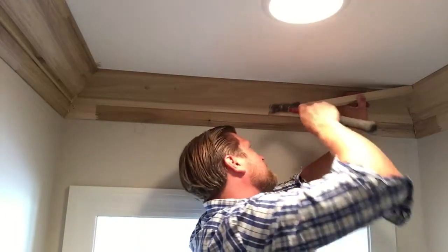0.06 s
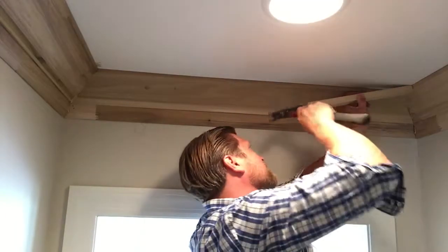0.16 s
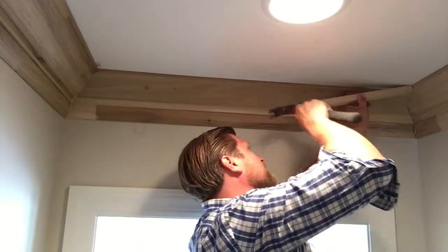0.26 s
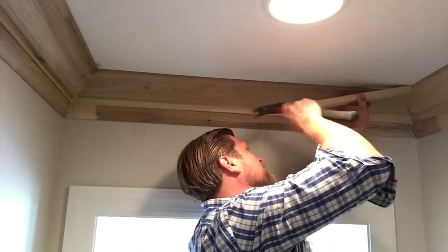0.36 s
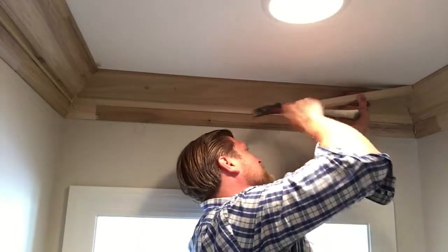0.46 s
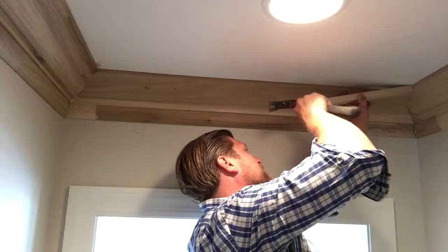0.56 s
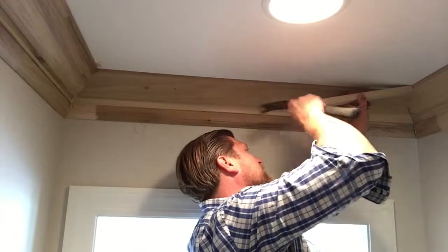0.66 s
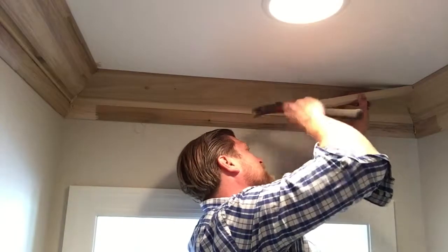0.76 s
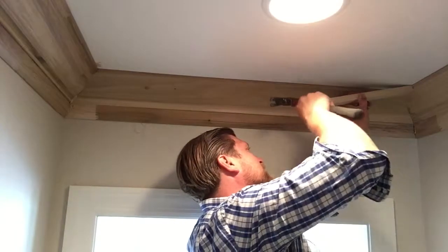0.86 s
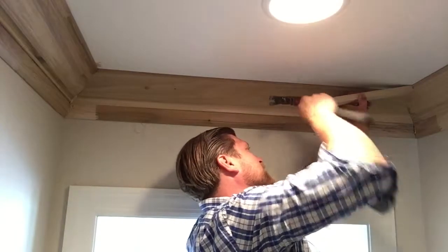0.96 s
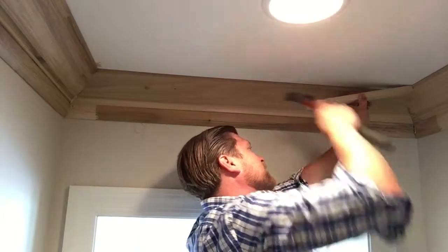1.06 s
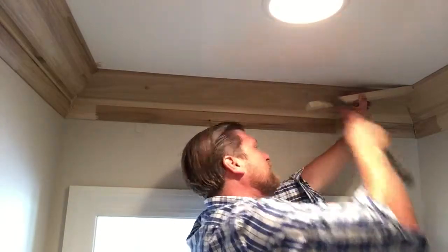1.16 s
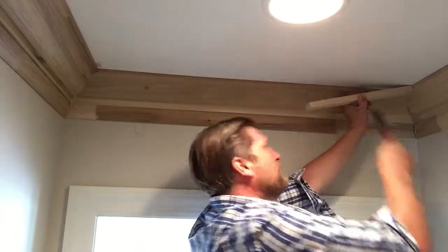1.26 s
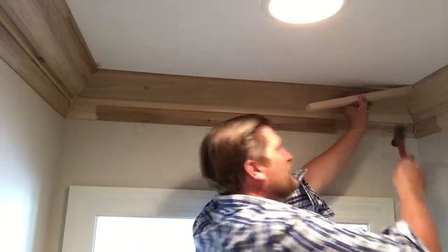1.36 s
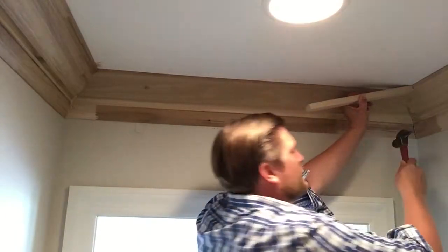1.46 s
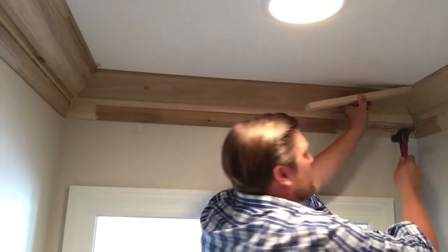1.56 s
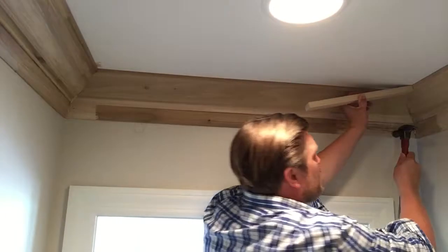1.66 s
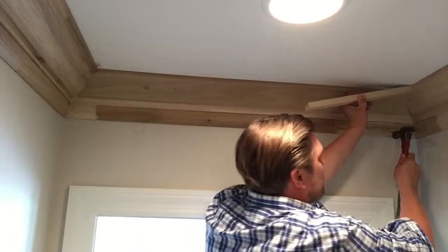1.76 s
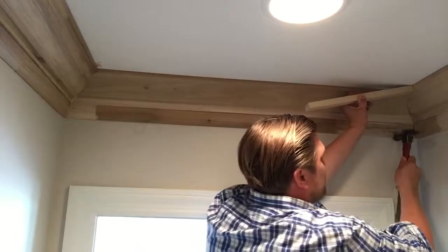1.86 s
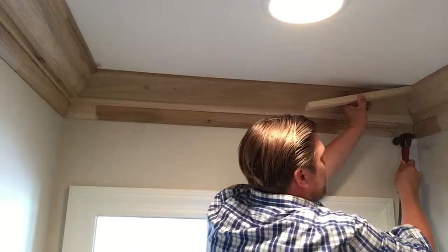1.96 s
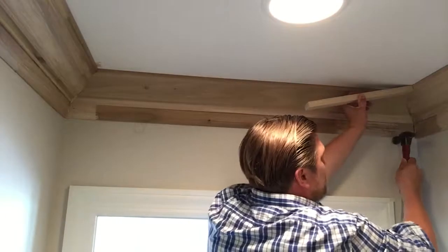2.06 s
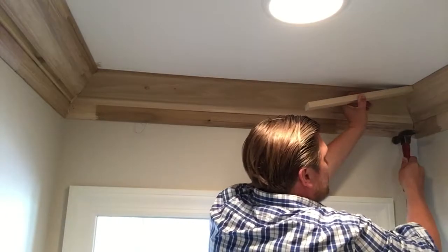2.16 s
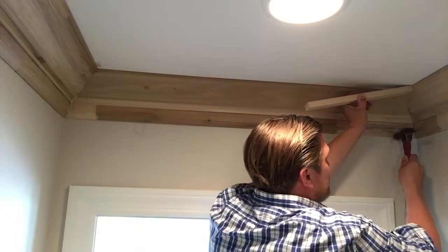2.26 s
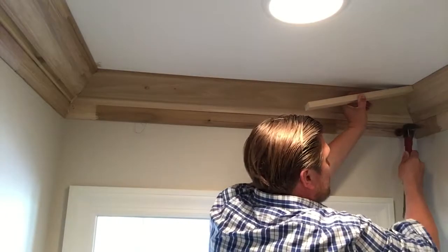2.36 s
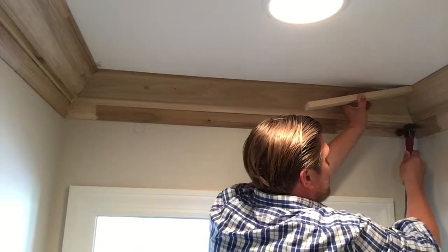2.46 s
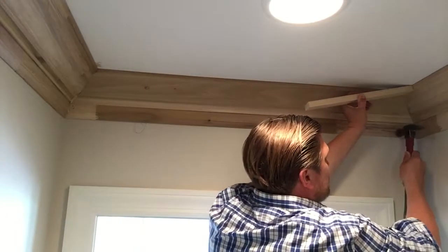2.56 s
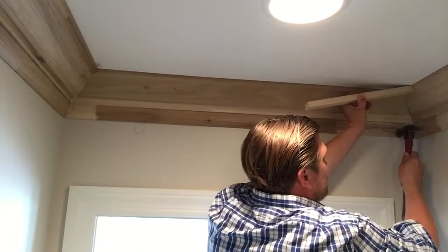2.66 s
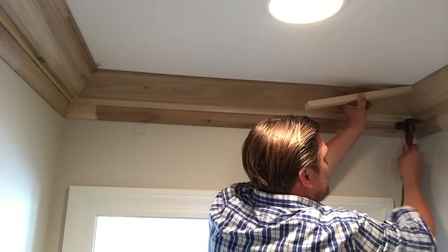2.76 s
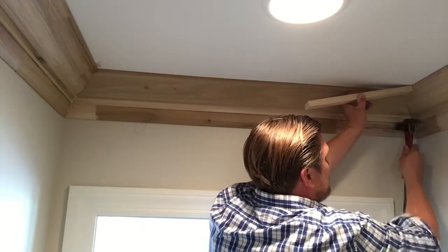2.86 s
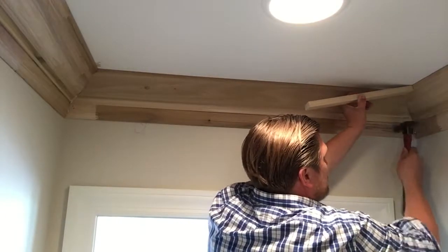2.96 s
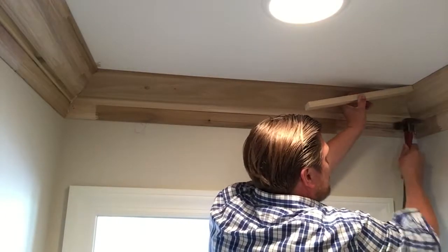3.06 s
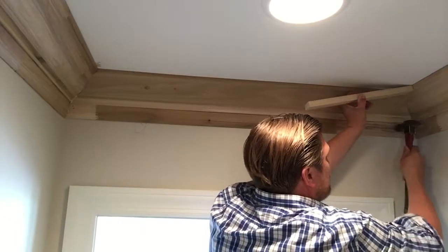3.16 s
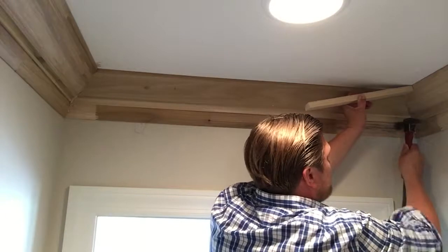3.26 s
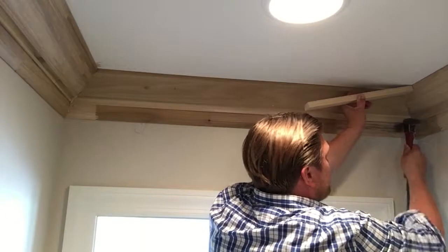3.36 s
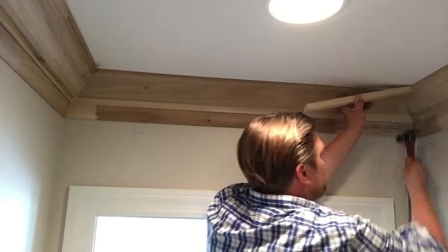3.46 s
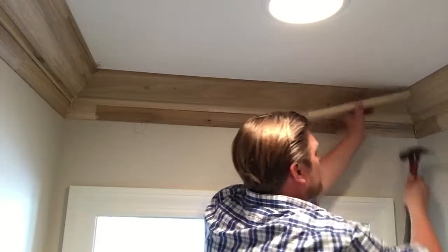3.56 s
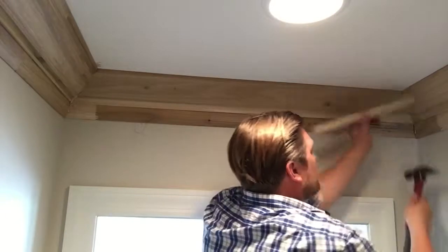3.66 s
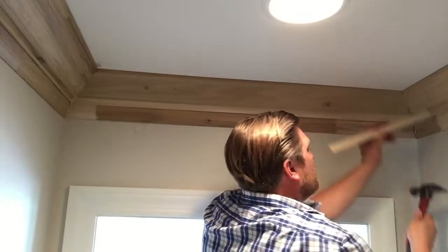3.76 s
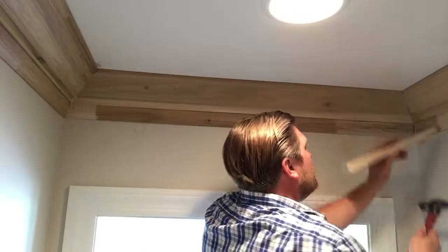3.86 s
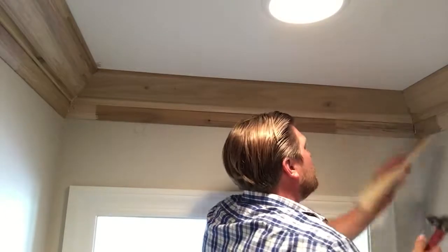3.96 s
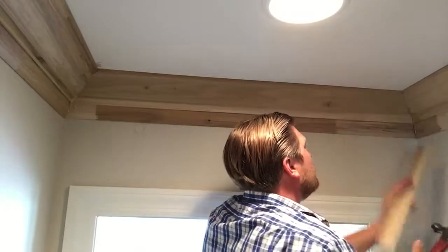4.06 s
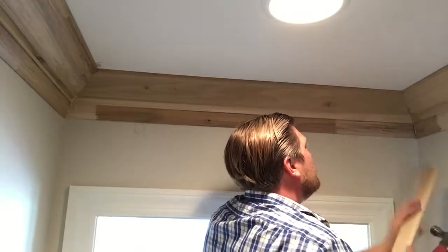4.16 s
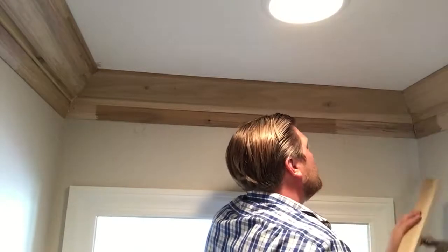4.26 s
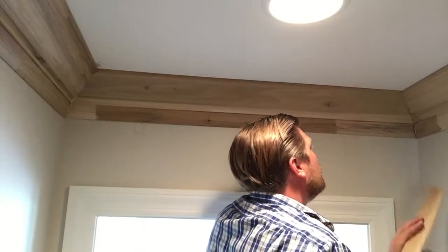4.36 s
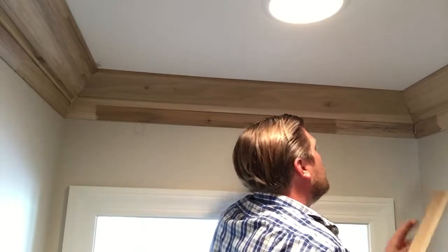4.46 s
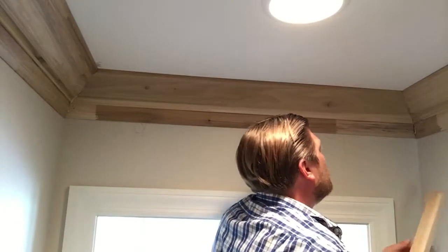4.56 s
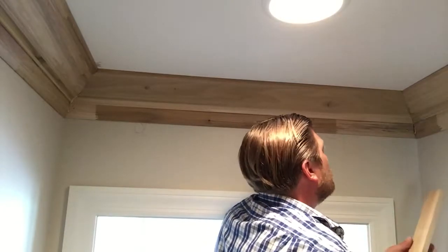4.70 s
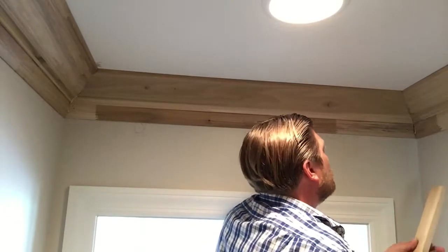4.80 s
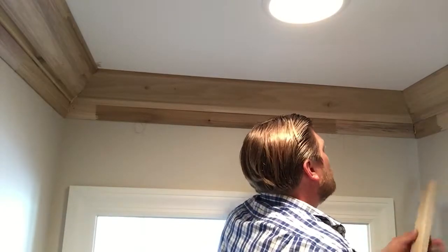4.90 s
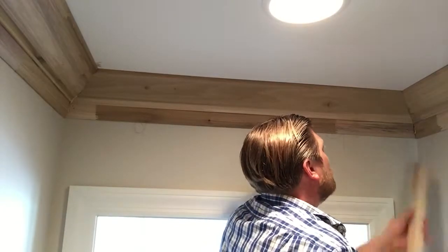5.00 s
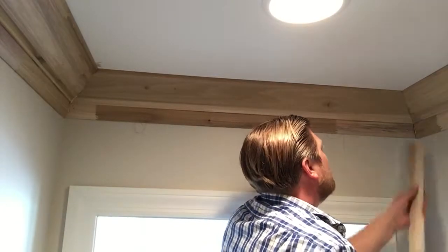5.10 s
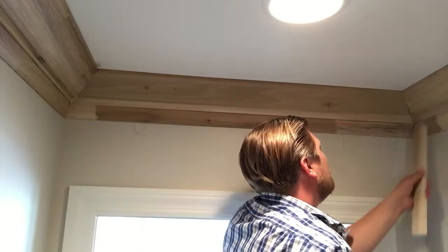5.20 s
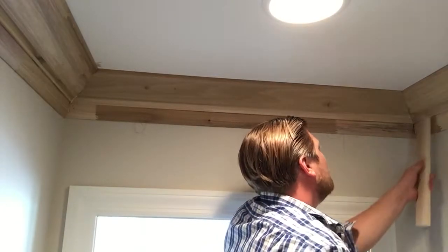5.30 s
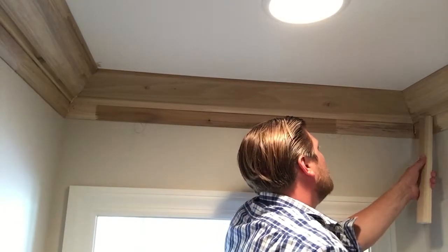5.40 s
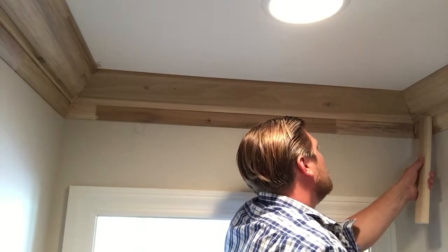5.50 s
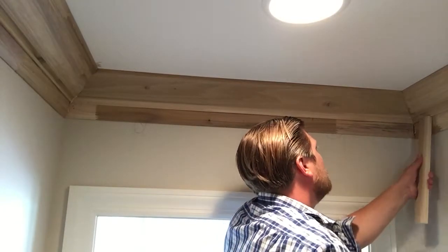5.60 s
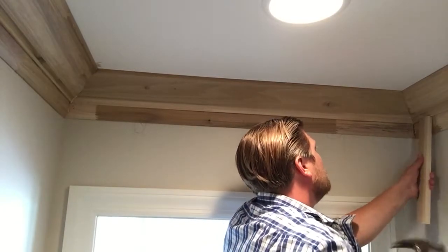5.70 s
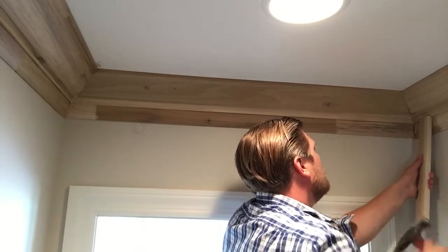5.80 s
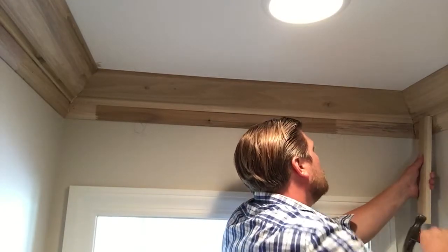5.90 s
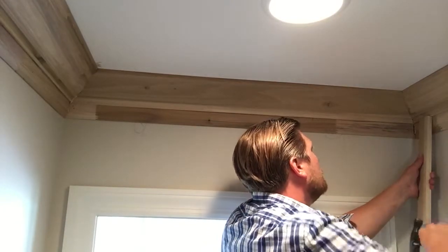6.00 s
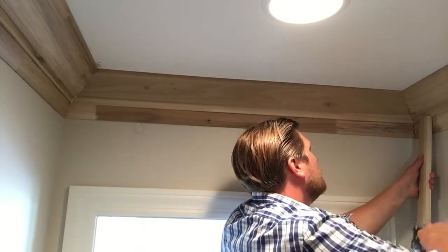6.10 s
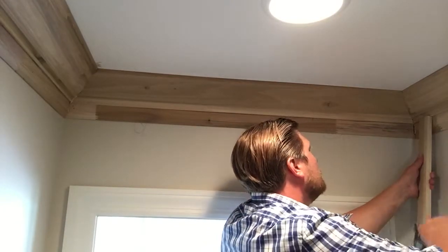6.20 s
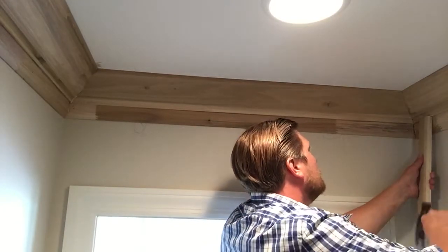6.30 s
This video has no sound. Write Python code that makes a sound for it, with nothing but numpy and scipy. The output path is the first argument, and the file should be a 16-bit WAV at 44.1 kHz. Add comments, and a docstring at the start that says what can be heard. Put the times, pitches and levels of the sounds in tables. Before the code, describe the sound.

In a small bare room, a hammer strikes a wood block on trim: three growing blows, the second and third very loud with a hollow wall thump. After a pause come irregular quick taps and thuds, then gritty scuffs, quiet sliding of wood in the hand with a light clack, and two dull knocks. The microphone is fairly close, overloading slightly on the loudest hits.

```python
"""A hammer knocks a wood block against wooden trim in a bare room, then thuds on the trim itself.
Each blow is a noise crack, a knock of briefly ringing wood modes and, a few ms later, the thump of trim and
wall modes. Random echoes and standing waves make the hard room ring on. Between runs the block scrapes off the
wall (coloured grit) and slides in the hand (stick-slip noise drives its modes). Loud blows overload."""
import sys
import numpy as np
from scipy import signal
from scipy.fft import rfft, irfft
from scipy.io import wavfile
from scipy.ndimage import uniform_filter1d

SR = 44100
rng = np.random.default_rng(int(sys.argv[2]) if len(sys.argv) > 2 else 0)


def bounce(signal):
    """Save signal as a 16-bit WAV file at the path given by the first command-line argument."""
    frames = np.transpose(np.atleast_2d(signal))
    limited = np.clip(frames, -1, 1)
    pcm = np.round(limited * 32767).astype(np.int16)
    wavfile.write(sys.argv[1], SR, pcm)


N = 279594
LEAD = SR // 4  # samples computed before time zero, for sounds that start earlier


def gain_of(db):
    """Level law: decibels to an amplitude ratio."""
    return 10 ** (np.asarray(db) / 20)


def evened(x):
    """Equal-power reference: scales a sound to rms 1."""
    return x / np.sqrt(np.mean(x ** 2) + 1e-20)


def read(points, hz):
    """Interpolation on a log frequency axis, much as the ear spaces pitch."""
    f, value = np.transpose(points)
    return np.interp(np.log(hz + 1), np.log(f + 1), value)


def add(mix, start_s, sound):
    """Superposition: adds a sound to the mix at its start time."""
    first = max(round(start_s * SR) + LEAD, 0)
    part = mix[first:][:len(sound)]
    part += sound[:len(part)]


def coloured(x, points):
    """Linear filtering: multiplies the spectrum by a table of levels."""
    hz = np.fft.rfftfreq(len(x), 1 / SR)
    return irfft(rfft(x) * gain_of(read(points, hz)), len(x))


def near_db(hz, centre_hz, db_per_octave2):
    """Modal excitation: the place touched favours the modes around one pitch."""
    return -db_per_octave2 * np.log2(hz / centre_hz) ** 2


def decaying_sine(hz, t60, t):
    """Damped oscillation: a sine that falls 60 dB in t60 seconds."""
    return gain_of(-60 * t / t60) * np.sin(2 * np.pi * hz * t)


def ring(hz, db, t60, rise_s, lag_s=0, size=9000):
    """Modal superposition: dying sines that swell over the contact time, each after its own lag; peak 1."""
    t = np.maximum(np.arange(size)[:, None] / SR - lag_s, 0)
    modes = gain_of(db) * decaying_sine(hz, t60, t) * (1 - np.exp(-t / rise_s))
    x = modes.sum(1)
    return x / np.abs(x).max()


def stroke(rise_s, hold_s, fade_db_per_s):
    """Envelope of a contact: swell, hold, then exponential decay over 40 dB."""
    t = np.arange(0, rise_s + hold_s + 40 / fade_db_per_s, 1 / SR)
    swell = np.minimum(t / rise_s, 1) ** 2
    return swell * gain_of(-fade_db_per_s * np.maximum(t - rise_s - hold_s, 0))


def impact_crack(size):
    """Broadband impact: coloured noise with a sub-millisecond rise and a short exponential decay."""
    # Spectrum of the crack. Each row: frequency in Hz, relative level in dB.
    crack_colour = [(1500, -10), (3000, 8.5), (5000, 3.5), (8000, -4.5), (12000, -10), (16000, -18.5)]
    t = np.arange(size) / SR
    noise = evened(coloured(rng.standard_normal(size), crack_colour))
    return noise * (1 - np.exp(-t / 0.0009)) * np.exp(-t / 0.0077)


def wood_knock(centre_hz, size):
    """Heavily damped modes: wood pressed under the hammer hardly rings."""
    # Modes of the pressed wood. Each row: frequency in Hz (shifted at every blow), relative level in dB.
    wood_modes = [(520, -1.5), (680, 4.5), (850, -7), (1100, -7), (1290, -1.5), (1500, 4), (1800, -2.5),
                  (2130, -2), (2440, -9.5), (2780, 0), (3250, -12.5), (3900, -8.5)]
    wood_hz, wood_db = np.transpose(wood_modes)
    # grip and grain shift the modes a little at every blow
    hz = wood_hz * rng.uniform(0.92, 1.04, len(wood_hz))
    db = wood_db + near_db(hz, centre_hz, 3.8)
    lag_s = rng.uniform(0, 0.00064, len(wood_hz))
    return ring(hz, db, t60=0.016, rise_s=0.00096, lag_s=lag_s, size=size)


def panel_thump(thump_db, centre_hz):
    """Dispersive bending waves: the trim and wall panel swing late, the low modes last."""
    # Modes of trim and wall panel. Each row: frequency in Hz, relative level in dB,
    # ring time in seconds before the limit and the blow's own factor.
    trim_modes = [(82.14, -8, 0.074), (112, -8, 0.06), (133, -6.5, 0.077), (162.84, -4.5, 0.25),
                  (201, 1.5, 0.077), (241.1, 7, 0.063), (300.4, 4.5, 0.05), (356.2, 8, 0.037),
                  (406.7, 1, 0.14), (450.5, 1, 0.086), (475.2, 0, .1), (568, -7, 0.027), (631, -9.5, 0.24)]
    trim_hz, trim_db, trim_t60 = np.transpose(trim_modes)
    # a harder blow presses longer before the panel swings
    press_s = max(0.0045 + 0.00002 * thump_db, 0)
    # a hard blow pins the trim to the wall, which shortens the ring
    free = min(0.7 - 0.01 * thump_db, 1.2)
    t60 = np.minimum(trim_t60, 36 / trim_hz) * free
    share_db = trim_db + near_db(trim_hz, centre_hz, 6.5)
    share_db = share_db + 1.5 * rng.standard_normal(len(trim_hz))
    # low bending waves travel slower
    lag_s = press_s * (centre_hz / trim_hz) ** 0.25
    swing = ring(trim_hz, share_db, t60, 0.0049, lag_s)
    # the first shove of the panel, which the wall soaks up at once
    shove = ring(np.array([1.1 * centre_hz]), 0, 0.033, 0.003, press_s)
    # a small panel moves little deep bass
    radiates = signal.butter(N=2, Wn=70, btype="high", fs=SR, output="sos")
    panel = signal.sosfilt(radiates, gain_of(-2.5) * swing + gain_of(-3) * shove)
    return -gain_of(thump_db) * panel


def all_round(x, size=24):
    """Directional averaging: a short pulse of the same smoothed power spectrum, its notches filled in."""
    power = uniform_filter1d(np.abs(rfft(x)) ** 2, size)
    pulse = irfft(np.sqrt(np.abs(power)), len(x))
    return np.roll(pulse, 128)[:256] * np.hanning(256)


def blows():
    """Impact radiation: crack and knock at once, panel later; returns the direct sound and the room's feed."""
    # Hammer blows. Each row: start in seconds, thump level in dB, knock level in dB relative to the thump,
    # centre of the favoured thump modes in Hz, centre of the favoured knock modes in Hz.
    hammer_blows = [(-.1, -23, -8, 303, 1870), (0.127, -33, -16.5, 193, 1470),
                    (0.281, -1.5, -4.5, 220.3, 1580), (.578, 7, 4, 293.4, 2200),
                    (0.893, 6.5, 4, 285.5, 2415), (1.615, -52, -30, 111.8, 1500),
                    (1.855, -11, -9, 205.9, 2500), (1.961, -23, -12, 202, 1480),
                    (2.028, -14, -9.5, 215.5, 600), (2.059, -15.5, -9, 244, 600),
                    (2.089, -13.5, -6.5, 199, 620), (2.138, -22.5, -26, 155.7, 1500),
                    (2.468, -7, -2, 258, 2700), (2.519, -12.5, -8.5, 277, 2790),
                    (2.599, -22, -20, 200, 1500), (2.617, -22, -26, 247, 1490),
                    (2.765, -29, -17, 186, 2840), (2.793, 0, -9, 173.5, 1380),
                    (3.065, -3, -11.5, 184, 1440), (3.248, -23.5, -19.5, 200, 1507),
                    (3.299, -9, -14.5, 195, 940), (3.519, -27, -18, 192, 700),
                    (3.726, -35.5, -9.5, 164.6, 1535), (3.973, -48, -18, 97.8, 1540),
                    (5.432, -17, -8, 244.5, 1000), (5.65, -13.5, -19.5, 270, 926)]
    near, wide, size = np.zeros(N + LEAD), np.zeros(N + LEAD), 2048
    for start_s, thump_db, knock_re_db, low_hz, mid_hz in hammer_blows:
        knock_db = thump_db + knock_re_db
        # the crack gains 0.21 dB on the knock for each dB of knock level
        crack_db = knock_db - 15.5 + 0.21 * max(knock_db, -20)
        crack = gain_of(crack_db) * impact_crack(size)
        face = crack + gain_of(knock_db) * wood_knock(mid_hz, size)
        thump = panel_thump(thump_db, low_hz)
        add(near, start_s, face)
        add(near, start_s, thump)
        add(wide, start_s, gain_of(-0.74) * all_round(face))
        add(wide, start_s, thump)
    return near, wide


def diffuse_echoes(x):
    """Diffuse reverberation: dense random echoes that die at a rate set by frequency."""
    # Decay of the room. Each row: frequency in Hz, nominal 60 dB decay in seconds, scaled for each tail below.
    decay_times = [(60, 0.57), (160, 0.31), (300, .45), (500, 0.48), (900, 0.64), (1500, 0.59),
                   (2900, 0.46), (6000, .45), (10000, 0.38), (15000, 0.19)]
    # Spectrum of the echoes. Each row: frequency in Hz, relative level in dB.
    echo_colour = [(30, -30), (70, 1), (250, -14.5), (500, 2.5), (700, 8), (950, -2.5), (1500, -3),
                   (2200, -6), (3200, -4.5), (8000, -1.5), (15000, -1)]
    hz, t, z = signal.stft(rng.standard_normal((3, SR)), SR, nperseg=512)
    fall_db = -60 * t / read(decay_times, hz)[:, None]
    # a fainter, slower tail follows the first
    fall = np.hypot(gain_of(2.0 * fall_db), gain_of(-9 + 0.65 * fall_db))
    z = z * gain_of(read(echo_colour, hz)[:, None]) * fall
    tails = signal.istft(z, SR, nperseg=512)[1][:, :SR]
    t = np.arange(SR) / SR
    tails = tails * np.clip((t - 0.003) / 0.0085, 0, 1)  # echoes build up after the first wall
    tails = tails / np.linalg.norm(tails, axis=1, keepdims=True)
    # the source moves, so the blend of three echo patterns turns, in radians
    turn = np.arange(len(x)) / SR * 2.6
    wet = 0
    for k, tail in enumerate(tails):
        share = np.cos(turn + k * np.pi / 3) * np.sqrt(2 / 3)
        wet = wet + signal.oaconvolve(x * share, tail)
    return wet[:len(x)]


def standing_waves(x):
    """Room resonance: waves between the walls ring on as damped modes."""
    # Room modes. Each row: frequency in Hz, relative level in dB, 60 dB decay in seconds.
    room_modes = [(53.7, -19, 0.26), (78.7, -20, 0.14), (88, -2.5, 0.23), (141, -17, 0.42),
                  (288, -21.5, 0.52), (327.5, -18.5, 0.57), (443.9, -14.5, 0.97), (470.4, -14, 0.4),
                  (550.6, -9, .8), (571.6, -7.5, 0.5), (626, -19.5, 0.6)]
    t = np.arange(SR) / SR
    modes = sum(gain_of(db) * decaying_sine(hz, t60, t) for hz, db, t60 in room_modes)
    modes = modes * (1 - np.exp(-t / 0.0043)) / np.sqrt(SR / 20)
    return signal.oaconvolve(x, modes)[:len(x)]


def room(x):
    """Room response: the diffuse echoes and the standing waves add up."""
    return gain_of(-3.0) * diffuse_echoes(x) + gain_of(-15) * standing_waves(x)


def hush():
    """Stationary noise: room tone and microphone hiss, with bass whose level wanders in lumps."""
    # Spectrum of the background. Each row: frequency in Hz, relative level in dB per Hz.
    hush_colour = [(15, -55.5), (25, -27), (70, 7.5), (301, -9.5), (326, -35.5), (394, -9), (503, -18),
                   (818, -14), (1100, -28), (1480, -18), (2050, -20), (3430, -23.5), (16000, -30.5)]
    steady = evened(coloured(rng.standard_normal(N), hush_colour))
    drift = uniform_filter1d(rng.standard_normal(N), 2500)
    lumps = evened(uniform_filter1d(drift, 2500))
    low_pass = signal.butter(N=2, Wn=200, fs=SR, output="sos")
    bass = signal.sosfilt(low_pass, steady)
    return gain_of(-63) * (steady + bass * (gain_of(3.5 * lumps) - 1))


def scuffs():
    """Sliding friction: wood on the wall makes gritty hiss, each scuff with its own spectral slope."""
    # Scuffs along the wall. Each row: start in seconds, swell in seconds, hold in seconds,
    # level in dB, spectral tilt in dB per octave.
    wall_scuffs = [(2.745, 0.0083, 0.061, -53, -3), (2.959, 0.0064, 0.0097, -47.5, 1.5),
                   (3.499, .15, 0.035, -60.5, -2), (3.67, 0.023, 0.0394, -56, 1.5),
                   (3.745, 0.0035, 0.0036, -42, 4.5), (3.755, 0.011, 0.011, -43, 1.5)]
    # Spectrum of a scuff before its tilt. Each row: frequency in Hz, relative level in dB per Hz.
    scuff_colour = [(530, -69), (900, -42), (1080, -26), (1360, 5.5), (3300, -3), (3910, 5.5), (5280, -1.5),
                    (5680, -2.5), (13400, -7), (16000, -23)]
    out, size = np.zeros(N + LEAD), SR // 2
    for start_s, swell_s, hold_s, db, tilt_db in wall_scuffs:
        grit = rng.standard_normal(size) * gain_of(1.4 * rng.exponential(1, size))
        # the slope pivots at 6 kHz
        colour = [(hz, level_db + tilt_db * np.log2(hz / 6000)) for hz, level_db in scuff_colour]
        hiss = evened(coloured(grit, colour))
        shape = stroke(swell_s, hold_s, fade_db_per_s=294)
        add(out, start_s, gain_of(db) * shape * hiss[:len(shape)])
    return out


# Modes of the loose block. Each row: frequency in Hz, relative level in dB (taken at 0.3 of it when rubbed),
# ring time in seconds before the limits of tap and hand.
BLOCK_MODES = [(439, -7, 0.085), (759, -5.5, 0.027), (1519, 0.5, 0.063), (1902, -11, 0.047),
               (2360, -21, 0.075), (3280, -15, 0.063), (3580, -7.5, 0.019), (4950, -18, 0.026),
               (5140, -17.5, 0.039), (6640, -18, 0.055), (7260, -26, 0.021), (8500, -20, 0.024)]


def slips(size):
    """Stick-slip friction: skin that catches and lets go gives spiky noise."""
    return rng.standard_normal(size) * gain_of(2.5 * rng.exponential(1, size))


def finger_stroke(hold_s):
    """Envelope of touch: a finger lands within 2.7 ms and leaves at a steady decibel rate."""
    return stroke(0.0027, hold_s, fade_db_per_s=550)


def hand_squeaks():
    """Friction-driven resonance: slips feed one narrow whine under the sliding hand."""
    # Squeaks. Each row: start in seconds, hold in seconds, level in dB.
    squeak_times = [(4.131, 0.0289, -74.5), (4.21, 0.0198, -73.5), (4.283, .03, -77), (4.38, .04, -68),
                    (4.769, .17, -68), (4.961, 0.079, -65.5), (5.069, 0.065, -72)]
    out, size = np.zeros(N + LEAD), SR // 3
    t = np.arange(size // 2) / SR
    whine = decaying_sine(1944, 0.38, t)
    for start_s, hold_s, db in squeak_times:
        squeak = evened(signal.oaconvolve(slips(size), whine)[:size])
        shape = finger_stroke(hold_s)
        add(out, start_s, gain_of(db) * shape * squeak[-len(shape):])
    return out


def hand_slides():
    """Forced vibration: skin friction feeds the modes of the block, damped by the hand."""
    # Finger slides. Each row: start in seconds, hold in seconds, rub level in dB,
    # favoured pitch in Hz, skin hiss level in dB.
    finger_slides = [(4.21, 0.0199, -72, 1900, -68.5), (4.287, 0.063, -71.5, 1800, -64.5),
                     (4.392, 0.042, -62.5, 1510, -61.5), (4.479, .04, -67, 1500, -69),
                     (4.6, .025, -69.5, 1580, -77), (4.727, .06, -66, 1520, -66.5),
                     (4.874, 0.052, -63, 806, -70.5), (4.94, 0.033, -62, 1510, -65),
                     (5.004, 0.023, -67.5, 3400, -59.5), (5.103, .025, -74, 2050, -64),
                     (5.299, .05, -76.5, 1497, -76.5), (5.359, 0.034, -68, 3550, -65)]
    out, t, size = np.zeros(N + LEAD), np.arange(3000) / SR, SR // 3
    for start_s, hold_s, rub_db, centre_hz, hiss_db in finger_slides:
        skin, rub = slips(size), 0
        for hz, mode_db, t60 in BLOCK_MODES:
            mode = decaying_sine(hz, min(0.59 * t60, 200 / hz), t)
            # shifting fingers
            grip_db = 3 * evened(uniform_filter1d(rng.standard_normal(size), 1500))
            level_db = 0.3 * mode_db + grip_db + near_db(hz, centre_hz, 2.4)
            rub = rub + gain_of(level_db) * evened(signal.oaconvolve(skin, mode)[:size])
        hiss = evened(np.diff(skin, prepend=0))
        sound = gain_of(rub_db) * rub + gain_of(hiss_db) * hiss
        shape = finger_stroke(hold_s)
        add(out, start_s, shape * sound[-len(shape):])
    return out


def block_taps():
    """Free vibration: the loose block touches the hammer and rings in its own modes."""
    # Taps. Each row: start in seconds, level in dB.
    light_taps = [(4.354, -27), (4.854, -39.5)]
    out = np.zeros(N + LEAD)
    hz, db, t60 = np.transpose(BLOCK_MODES)
    for start_s, tap_db in light_taps:
        tap = ring(hz, db, np.minimum(t60, 0.07), rise_s=0.0001, size=3000 * 3)
        add(out, start_s, gain_of(tap_db) * tap)
    return out


def scene():
    """Superposition: all sources share one room and one microphone."""
    near, wide = blows()
    small = scuffs() + hand_squeaks() + hand_slides() + block_taps()
    reverberant = room(wide + gain_of(-5.5) * small)
    heard = (near + small + reverberant)[LEAD:]
    return (heard + hush())[None]


def record(dry):
    """Transduction: the microphone drops deep bass, the converter saturates near full scale, then a band limit."""
    bass_cut = signal.butter(N=2, Wn=30, btype="high", fs=SR, output="sos")
    heard = signal.sosfilt(bass_cut, dry)
    flat = heard / (1 + np.abs(heard / 0.99) ** 8) ** (1 / 8)
    band_limit = signal.firwin(511, 16290, window=("kaiser", 9), fs=SR)  # low-pass, cutoff in Hz
    return signal.oaconvolve(flat, band_limit[None], "same")


dry = scene()
out = record(dry)
bounce(out)
```